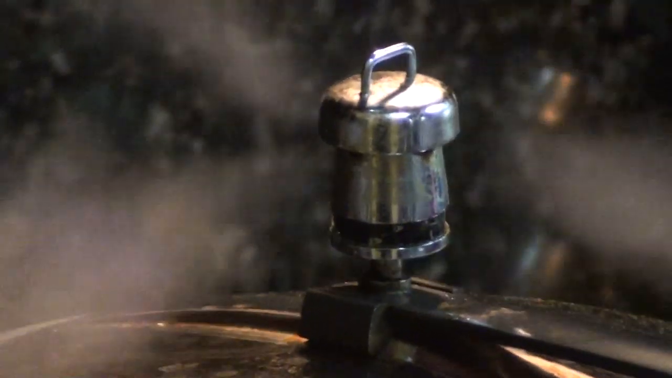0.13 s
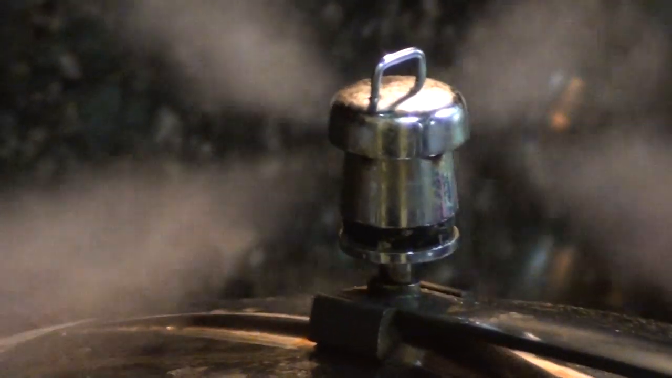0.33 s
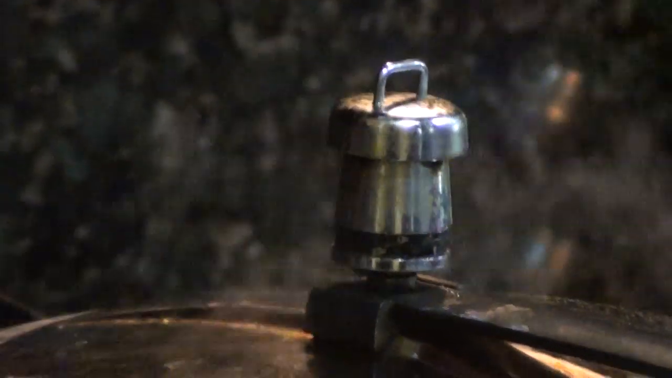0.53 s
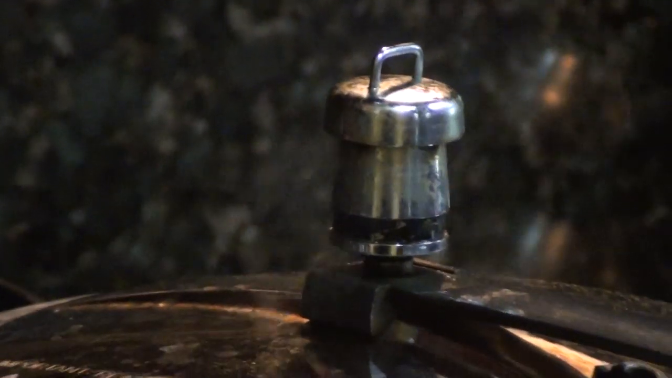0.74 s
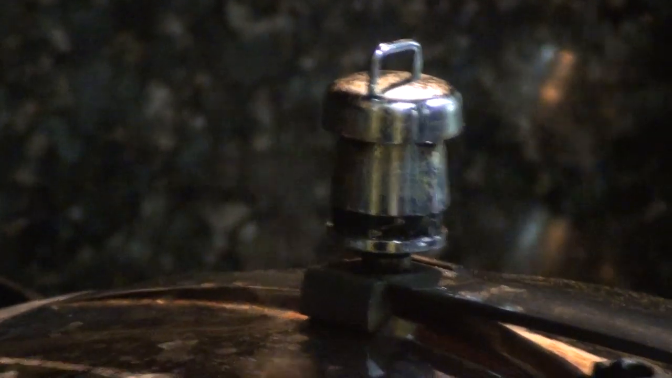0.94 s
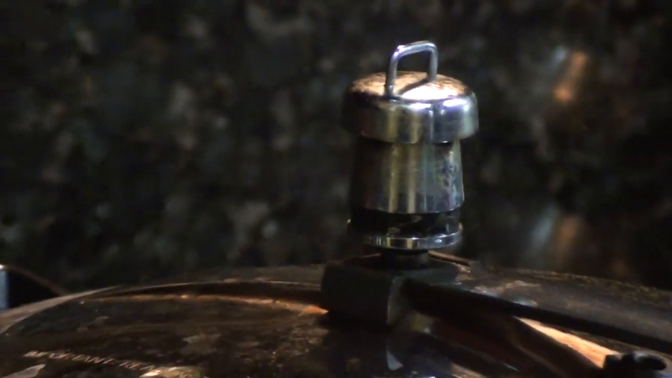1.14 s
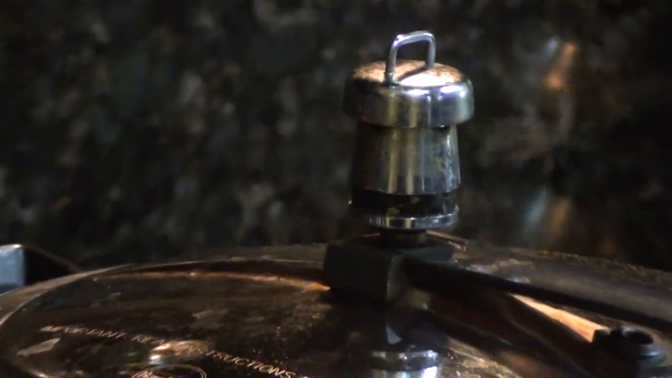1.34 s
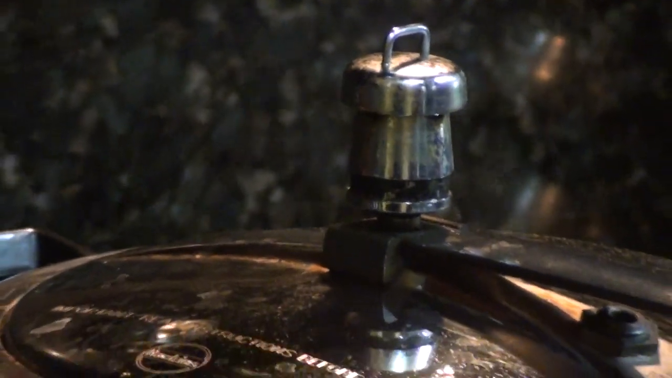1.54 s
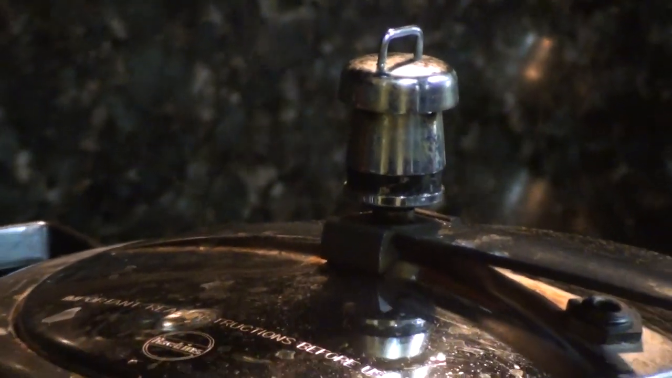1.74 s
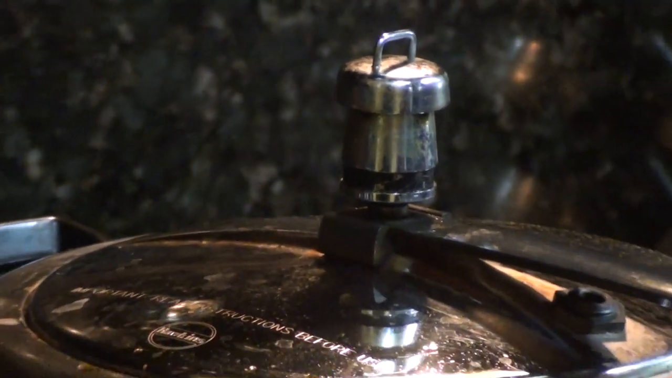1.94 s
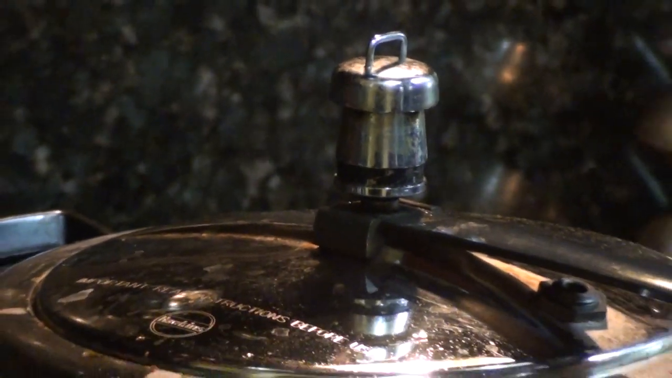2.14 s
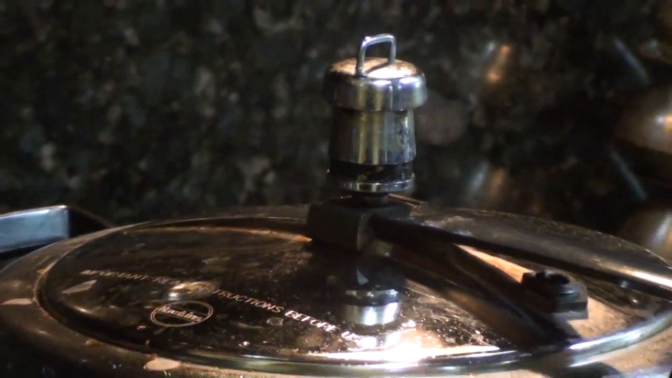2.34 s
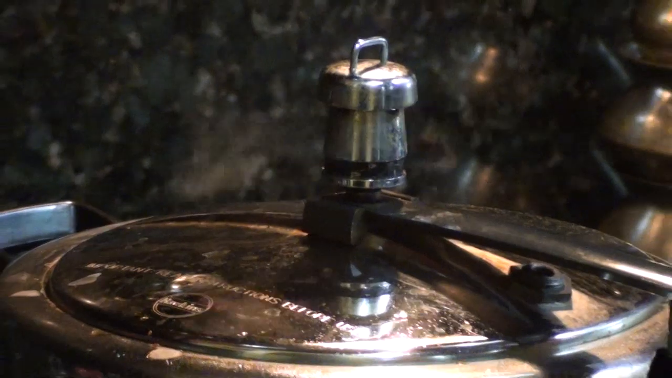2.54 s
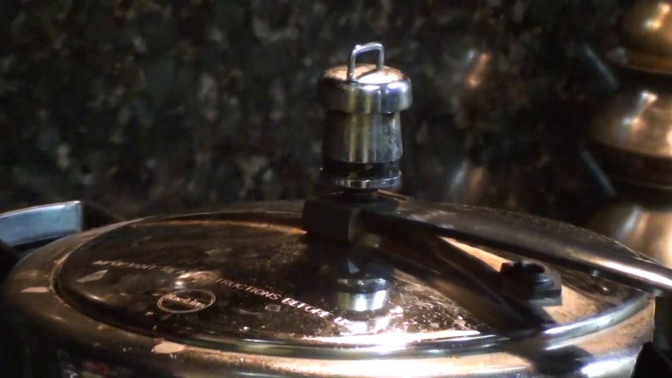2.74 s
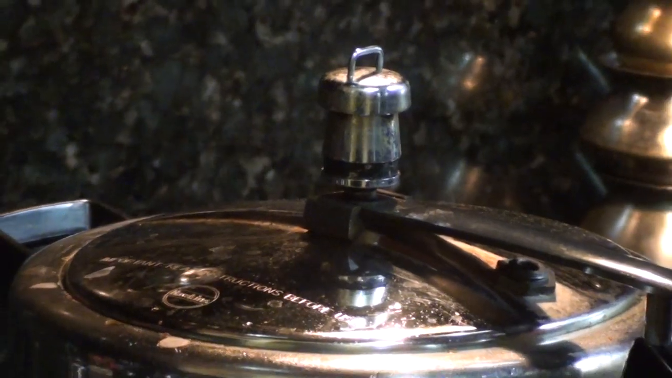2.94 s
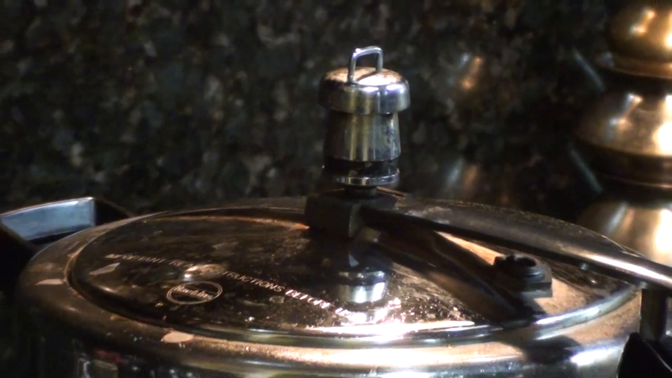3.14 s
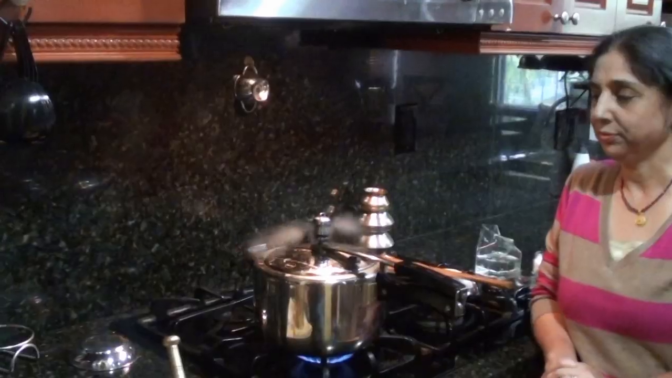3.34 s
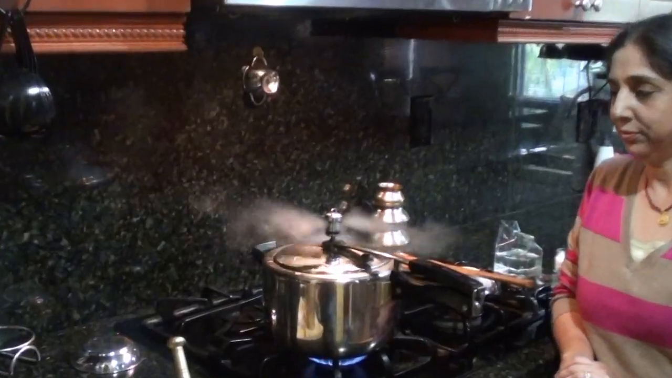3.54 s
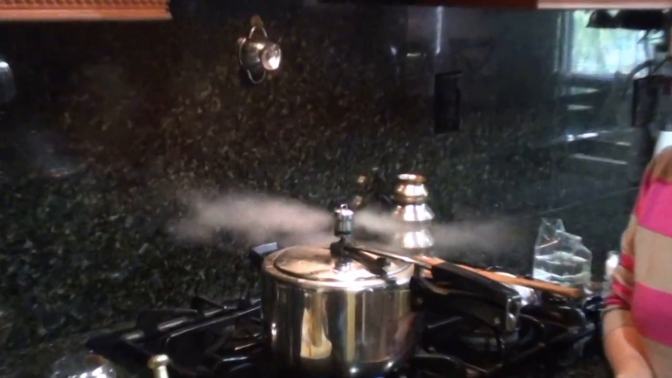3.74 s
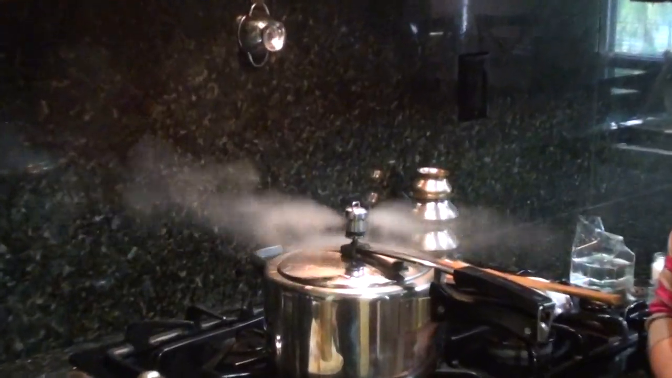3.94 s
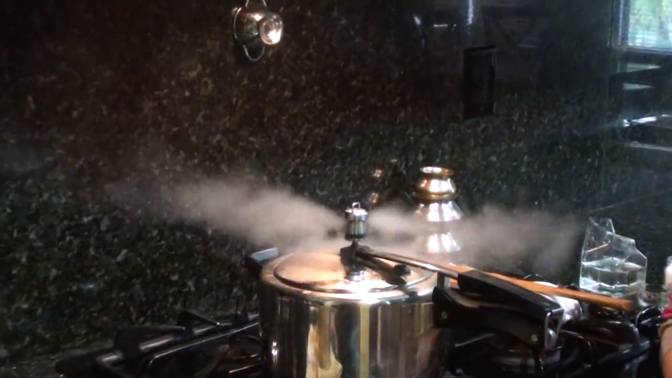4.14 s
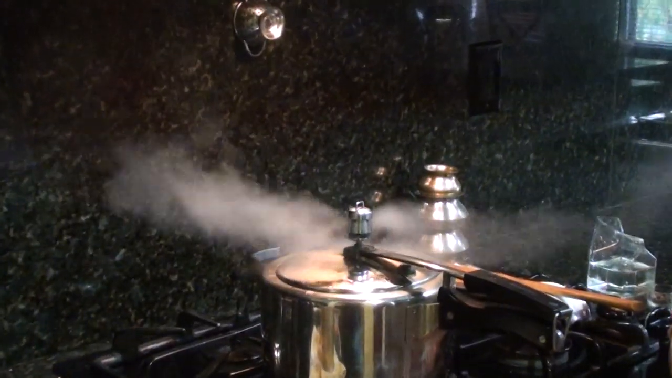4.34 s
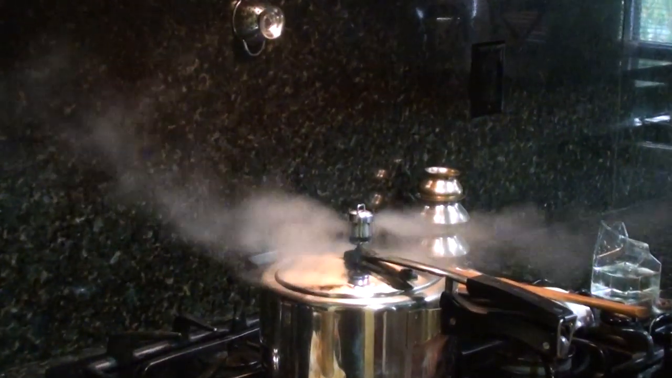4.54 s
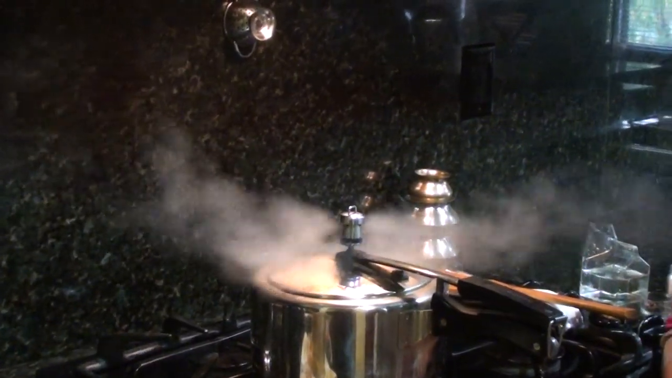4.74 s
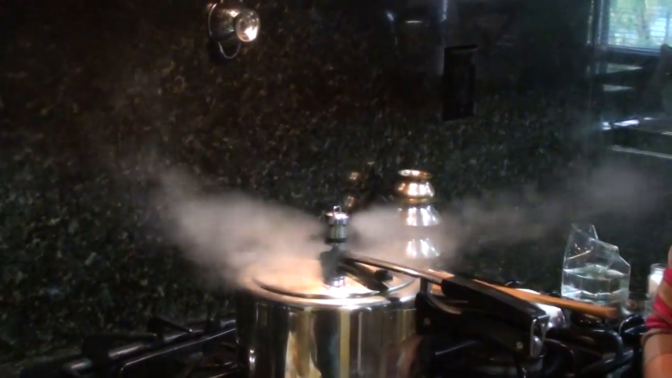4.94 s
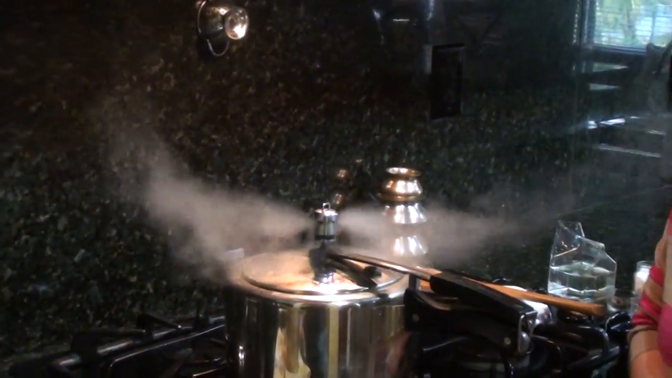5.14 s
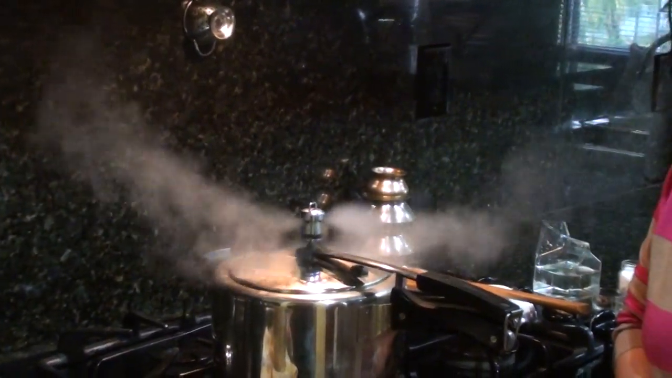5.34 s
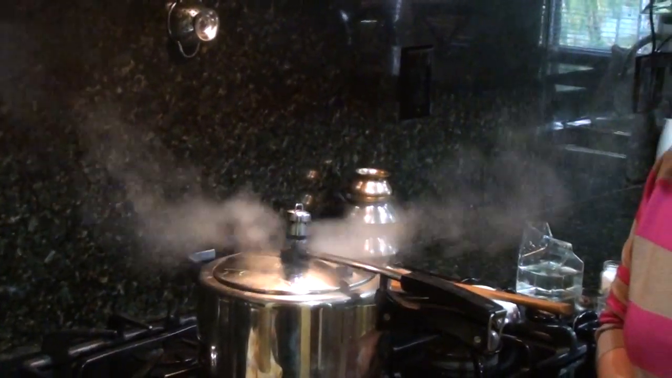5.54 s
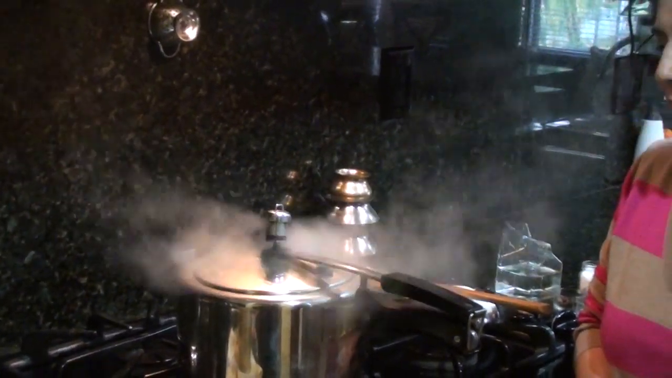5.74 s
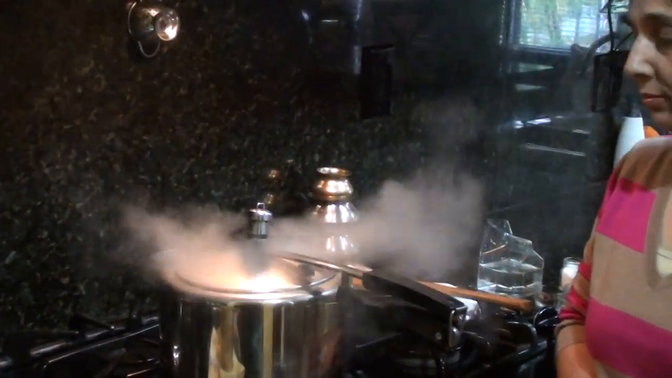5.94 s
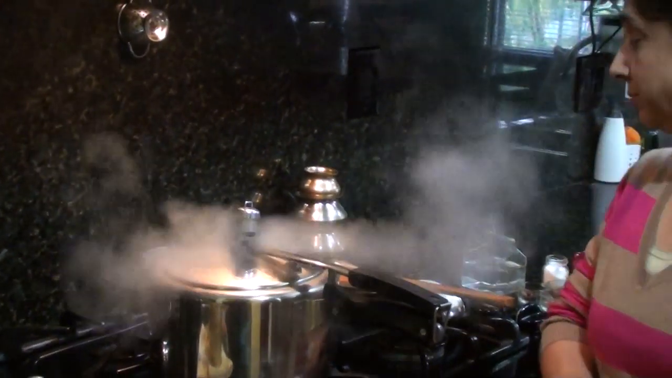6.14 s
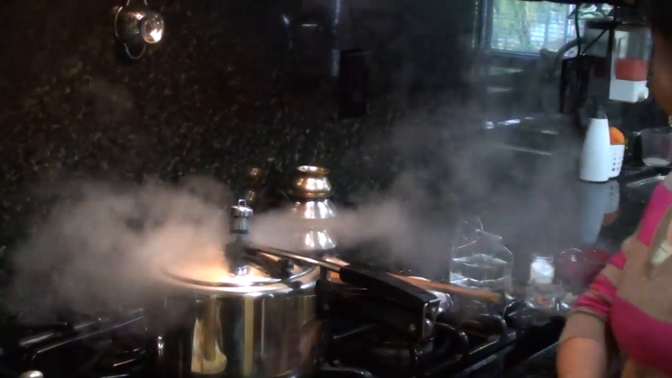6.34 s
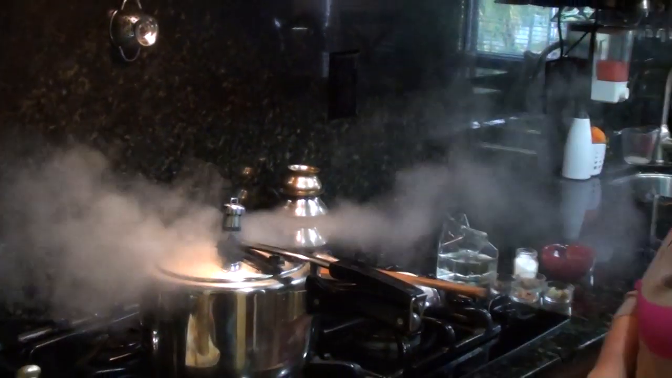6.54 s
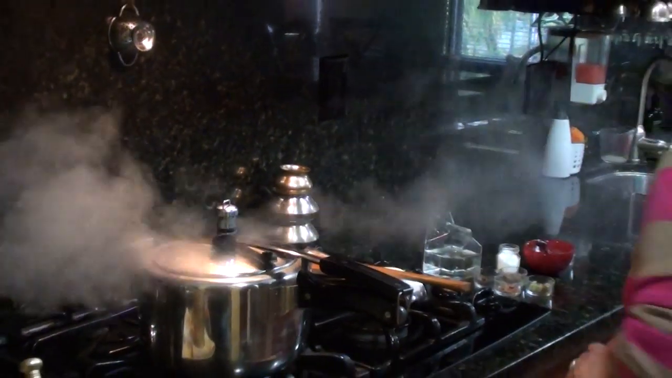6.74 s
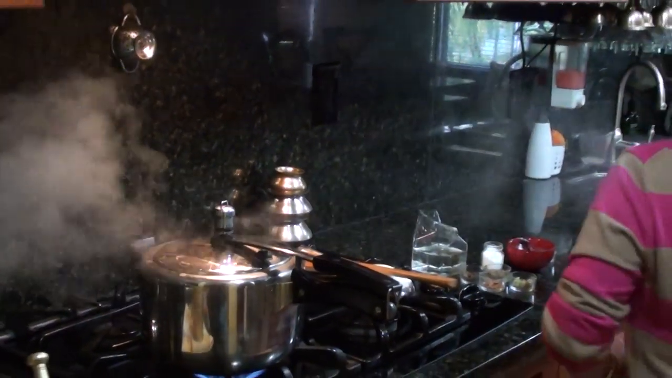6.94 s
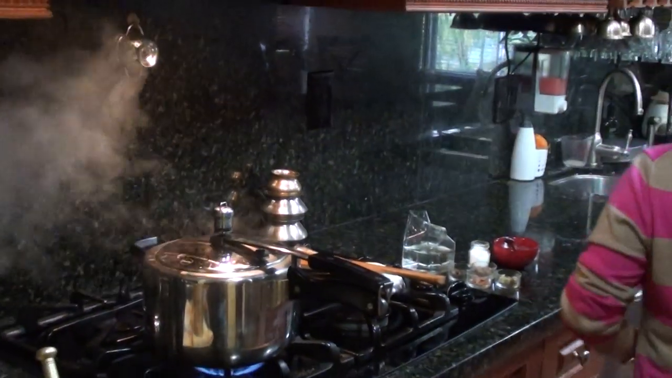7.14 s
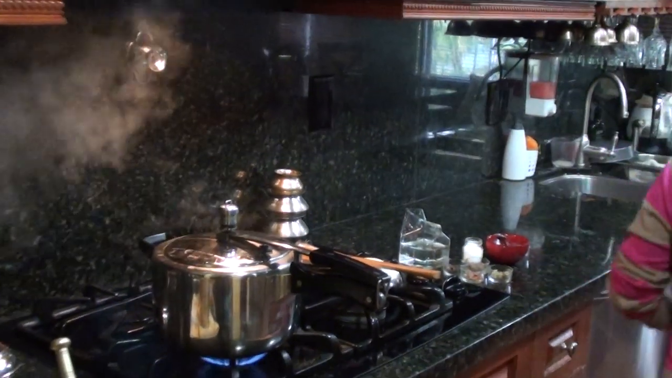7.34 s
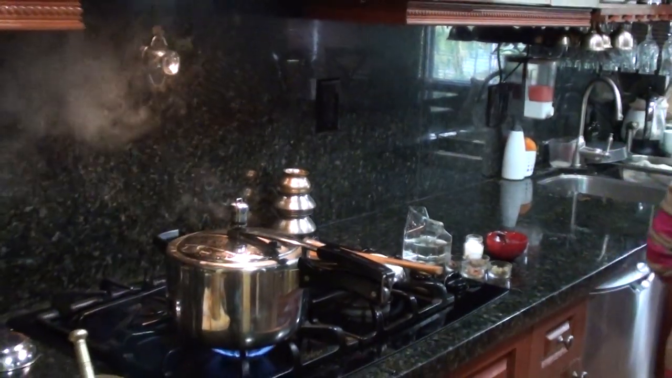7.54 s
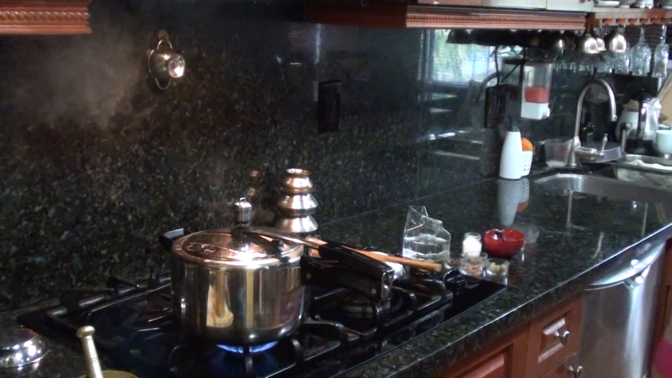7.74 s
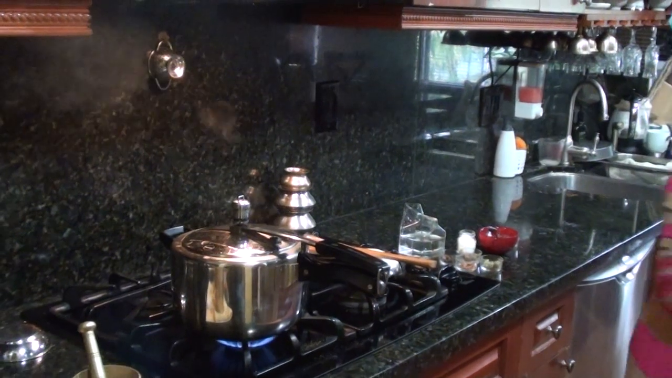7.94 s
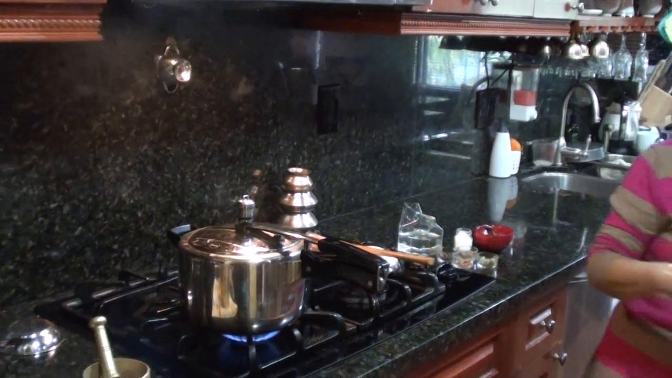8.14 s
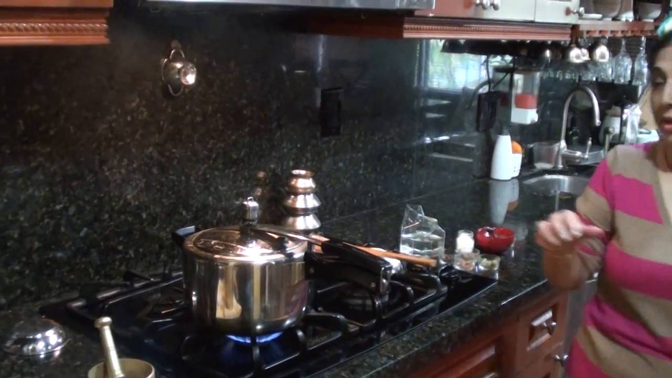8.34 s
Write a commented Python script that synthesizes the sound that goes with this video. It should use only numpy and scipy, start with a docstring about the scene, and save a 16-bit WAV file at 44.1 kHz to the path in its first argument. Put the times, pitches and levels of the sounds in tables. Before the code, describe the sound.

A pressure cooker close by in a small kitchen lets out a loud, bright hiss of steam, cut off almost at once by the hollow clunk of its weighted valve. A thin leak throbs and slowly grows over a murmuring gas flame. A second loud hiss bursts out, holds for over three seconds and ends in a rattling clunk. The faint leak returns, followed by light taps and a brief scrape.

```python
"""Pressure cooker on a gas stove

In a small kitchen, steam lifts a weighted valve twice and escapes as a hissing turbulent jet.
Each time the weight drops shut, its impact rings the pot's modes with a hollow clunk, and a thin
leak throbs while pressure builds. The flame murmurs below; near the end something nearby is
knocked, then pushed along with stick-slip friction."""
import sys
import numpy as np
from scipy import signal
from scipy.fft import rfft, irfft
from scipy.io import wavfile
from scipy.ndimage import uniform_filter1d, map_coordinates

SR = 44100
rng = np.random.default_rng(int(sys.argv[2]) if len(sys.argv) > 2 else 0)


def to_wav(s):
    """Save 16-bit WAV."""
    ch = np.atleast_2d(s).T  # columns
    pcm = np.round(np.clip(ch, -1, 1) * 32767)  # PCM
    wavfile.write(sys.argv[1], SR, pcm.astype(np.int16))


N = 373968
T = np.arange(N) / SR
CLOSING_DB_PER_S = 312  # the sinking weight chokes the flow

# valve open: lift_s, sink_s, level_db, thinning_s
BLOWS = [(0, 0.554, -15.5, 1.2), (3.35, 6.725, -15, 5.5)]
# valve shut, pressure building: start_s, end_s, leak_db, leak_rise_db_per_s,
# throb_crest_s, throb_hz, murmur_db, murmur_rise_db_per_s
BUILD_UPS = [(.6, 3.35, -59, 4, 1.25, 3.87, -66, 3), (6.8, 8.6, -57.5, 4, 7.57, 4.2, -61, 3.2)]


def amp(db):
    """Decibels to amplitude ratio."""
    return 10 ** (np.asarray(db) / 20)


def unit(x):
    """Normalisation to rms 1."""
    return x / np.sqrt(np.mean(x ** 2) + 1e-20)


def read(points, hz):
    """Interpolation along a log-frequency axis."""
    table_hz, value = np.transpose(points)
    return np.interp(np.log(hz + 1), np.log(table_hz + 1), value)


def shaped(x, points):
    """Zero-phase filtering by rows of frequency_hz, gain_db."""
    return irfft(rfft(x) * amp(read(points, np.fft.rfftfreq(N, 1 / SR))), N)


def add(mix, start_s, sound):
    """Superposition of a sound onto the mix."""
    part = mix[round(start_s * SR):][:len(sound)]
    part += sound[:len(part)]


def envelope(start, end, rise_s, fall_db_per_s):
    """Linear attack from start, a hold at 1, exponential decay after end."""
    return np.clip((T - start) / rise_s, 0, 1) * amp(-fall_db_per_s * np.maximum(T - end, 0))


def drift(rate_hz):
    """Random modulation: low-passed noise of rms 1."""
    hz = np.fft.rfftfreq(N, 1 / SR)
    return unit(irfft(rfft(rng.standard_normal(N)) * np.exp(-(hz / rate_hz) ** 2) * (hz > 0), N))


def hiss(colour, resonances):
    """Source and filter: broadband turbulence coloured by resonant peaks and dips."""
    hz = np.fft.rfftfreq(N, 1 / SR)
    peaks_db = sum(db / (1 + (2 * (hz - centre) / width) ** 2) for centre, width, db in resonances)
    return unit(irfft(rfft(rng.standard_normal(N)) * amp(read(colour, hz) + peaks_db), N))


def low_cut(x, hz):
    """Radiation efficiency: small bodies give out little bass."""
    return signal.sosfilt(signal.butter(2, hz, "high", fs=SR, output="sos"), x)


def tail():
    """Diffuse reflections of total energy 1; absorption takes the highest treble first."""
    # reverberation time of the kitchen: frequency_hz, t60_s
    decay_times = [(150, 0.74), (700, 0.35), (2500, 0.46), (7000, 0.39), (15000, 0.12)]
    hz, t, bands = signal.stft(rng.standard_normal(SR // 2), SR, nperseg=256)
    bands = bands * amp(-60 * t / read(decay_times, hz)[:, None]) * (t > .002)
    bands /= np.sqrt(uniform_filter1d((abs(bands) ** 2).sum(1), 3))[:, None]  # equal energy per band
    echoes = signal.istft(bands, SR, nperseg=256)[1]
    return echoes / np.linalg.norm(echoes)


def kitchen(x, wet_db, turning=False):
    """Direct plus reverberant field; a turning field crossfades slowly between two tails."""
    angle = 2 * np.pi * 0.3465 * T + rng.uniform(0, 2 * np.pi)
    shares = [np.cos(angle), np.sin(angle)] if turning else [1]
    wet = sum(share * signal.oaconvolve(x, tail())[:N] for share in shares)
    return (x + amp(wet_db) * wet) / np.hypot(1, amp(wet_db))


def jet(blow, colour, vent):
    """Jet noise under the lifted weight: a puff, a hold that thins if it lasts, a quick choke."""
    # jet spectrum once the pressure gives way: frequency_hz, density_db
    thin_colour = [(180, -48), (300, -36.5), (331, -36), (518, -46.5), (611, -32.5), (771, -27),
                   (1520, -24), (2080, -14), (2540, -16.5), (3000, -13), (3840, -16), (4170, -11),
                   (8510, 2.5), (11700, -4), (15700, -19.5)]
    lift_s, sink_s, level_db, thinning_s = blow
    thin_share = np.interp(np.tanh((T - thinning_s) / .072), [-1, 1], [.074, .92])
    steam = np.sqrt(1 - thin_share) * hiss(colour, vent) + np.sqrt(thin_share) * hiss(thin_colour, vent)
    puff = 1 + 0.89 * np.exp(-np.maximum(T - lift_s, 0) / 0.011)
    flutter_db = .3 * drift(45)
    return steam * envelope(lift_s, sink_s, 1 / SR, CLOSING_DB_PER_S) * puff * amp(level_db + flutter_db)


def lid_echo(x, start_s, delay_ms, slide_ms_per_s, reflection=.19):
    """Comb filtering: a reflection off the lid makes ripples that slide if its path changes."""
    emitted_s = T - (delay_ms + slide_ms_per_s * (T - start_s)) / 1000
    echo = map_coordinates(x, [emitted_s * SR], order=3, mode="wrap")
    return (x + reflection * echo) / np.hypot(1, reflection)


def plumes(count=3):
    """Incoherent sources add in power: each blow is several jets, each with its own room echoes."""
    # jet spectrum of each blow: frequency_hz, density_db
    first_colour = [(150, -48), (450, -42.5), (680, -25), (1100, -28), (1500, -21.5), (1900, -17.5),
                    (2800, -12), (3600, -12.5), (4300, -7.5), (7900, 0.5), (9700, 0), (10800, -6.5),
                    (12100, -5.5), (13000, -11), (15700, -18.5)]
    second_colour = [(180, -50.5), (300, -36), (446, -49), (746, -21), (866, -26.5), (1570, -21.5),
                     (1850, -13), (1980, -16.5), (2950, -12), (3660, -14.5), (4310, -9.5), (7960, 1),
                     (11100, -2.5), (13300, -15), (15700, -16.5)]
    # resonances of vent, weight and lid in each blow: centre_hz, width_hz, boost_db
    first_vent = [(690, 140, 2), (1860, 90, 3), (2750, 120, 3), (3580, 150, -3), (4820, 130, 3),
                  (6450, 130, 3), (7150, 160, 5), (7430, 150, -3), (7950, 110, 2), (8140, 120, -4),
                  (8320, 130, 3), (8720, 130, 3)]
    second_vent = [(740, 180, 1), (1863, 80, 3), (3780, 200, -3), (7270, 130, 1.5), (8020, 120, -2),
                   (8210, 150, 1)]
    # path off the lid to a moving listener, per blow: delay_ms, slide_ms_per_s
    lid_paths = [(2.02, 0), (1.961, -.007)]
    colours, vents = (first_colour, second_colour), (first_vent, second_vent)
    out = np.zeros(N)
    for blow, colour, vent, path in zip(BLOWS, colours, vents, lid_paths):
        steam = sum(kitchen(jet(blow, colour, vent), wet_db=1.5, turning=True) for _ in range(count))
        out += lid_echo(steam, blow[0], *path)
    return out / np.sqrt(count)


def burner():
    """Combustion noise with faint pot resonances; the murmur swells while the valve is shut."""
    # spectrum of flame and simmering pot: frequency_hz, density_db
    colour = [(15, -42), (25, -29), (108, -1.5), (168, -0.5), (569, -6), (636, -7.5), (760, -8),
              (991, -5.5), (1650, -11), (2460, -10.5), (3670, -15.5), (3920, -16), (4190, -11),
              (5000, -13.5), (6500, -30), (11000, -120)]
    rings = [(188, 25, 1.33), (641, 32, 6.8), (1375, 36, 7.4)]  # centre_hz, width_hz, boost_db
    level_db = np.full(N, -65.5)  # with the valve open
    for start, end, *_, murmur_db, rise in BUILD_UPS:
        level_db = np.where((T >= start) & (T < end), murmur_db + rise * (T - start), level_db)
    return hiss(colour, rings) * amp(level_db + 0.2 * drift(6.6))


def clunks(ping_hz=3240, ping_t60=.35):
    """Modal ringing: the weight strikes its seat; neighbouring pot modes start in opposite phase."""
    # the weight lands and rebounds: start_s, level_db, hardness_db_per_octave, ping_db
    landings = [(.577, -22.5, -3, -38), (.606, -29, -3, -58), (6.749, -26.5, 0, -66), (6.754, -29, 0, -70),
                (6.779, -30, -1, -70), (6.793, -30, -1, -70)]
    # modes of the closed pot: pitch_hz, level_db, t60_s
    pot_modes = [(231, -24.5, 0.21), (572, -13, .05), (645, -3.5, 0.093), (708, -1.5, 0.15),
                 (764, -22, 0.076), (883, -12, 0.11), (971, -12, .1), (1205, -7.5, 0.089),
                 (1307, -10, 0.086), (1467, -2.5, 0.051), (1760, -7, 0.037), (2110, -5, 0.05),
                 (2340, -3, 0.047), (2900, -26, .03)]
    out, t = np.zeros(N), T[:SR // 2]
    for start, db, hardness, ping_db in landings:
        for k, (hz, mode_db, t60) in enumerate(pot_modes):
            tilt_db = hardness * np.log2(hz / 700)
            decay = amp(db + mode_db + tilt_db - 60 * t / t60)
            add(out, start, (-1) ** k * decay * np.sin(2 * np.pi * hz * t))
        lid_flex = amp(db + 10 - 60 * t / 0.0088) * np.cos(2 * np.pi * 780 * t)
        weight_ping = amp(ping_db - 60 * t / ping_t60) * np.sin(2 * np.pi * ping_hz * t)
        add(out, start, lid_flex + weight_ping)
    return low_cut(out, hz=90)


def leak(throb_depth_db=2, throb_fade_s=3.4, waver_hz=10, swell_db_per_s=1.5):
    """Flow through a narrow gap: a throbbing hiss that grows with pressure, and wavering whistles."""
    # spectrum of the seeping steam: frequency_hz, density_db
    colour = [(1180, -25), (2000, -14.5), (2480, -12), (3300, -13), (3800, -14), (4090, -15), (7100, -1),
              (8380, -4), (9790, -5.5), (14300, -18.5)]
    # resonances of the gap: centre_hz, width_hz, boost_db
    seat = [(2520, 30, 6), (5880, 130, 4), (6150, 68, 2), (6870, 90, -2), (7360, 60, -2), (7600, 71, 3.5),
            (8850, 100, -5), (9900, 270, -4.5)]
    # faint tones of the gap: start_s, end_s, pitch_hz, level_db
    whistles = [(1.15, 2.73, 3838, -69.5), (1.4, 2.74, 3898, -75), (7.64, 7.99, 3898, -71),
                (7.68, 7.99, 3957, -73)]
    flow = amp(-46) * envelope(6.948, 6.973, .025, 60 / .35)  # a last spit as the weight settles
    for start, end, db, rise, crest_s, throb_hz, _, _ in BUILD_UPS:
        age = np.maximum(T - start, 0)
        depth_db = throb_depth_db * np.exp(-age / throb_fade_s)  # shrinks as the pressure steadies
        throb_db = depth_db * np.cos(2 * np.pi * throb_hz * (T - crest_s))
        gate = envelope(start, end, .05, CLOSING_DB_PER_S)
        flow = np.hypot(flow, amp(db + rise * age + throb_db) * gate)
    seep = hiss(colour, seat) * flow * amp(0.54 * drift(60))
    for start, end, hz, db in whistles:
        pitch_hz = hz + waver_hz * drift(96)
        gate = envelope(start, end, rise_s=.09, fall_db_per_s=170)
        gain = amp(db + swell_db_per_s * (T - start)) * gate
        seep += np.sqrt(2) * gain * np.sin(2 * np.pi * np.cumsum(pitch_hz) / SR)
    return seep


def low_thump(level_db=-34, width_s=.00074):
    """A critically damped transient: a brief low thump at the abrupt start of the second hiss."""
    age = np.maximum(T - BLOWS[1][0], 0) / width_s
    return amp(level_db) * (age > 0) * (1 - age) * np.exp(-age)


def ticks_and_bumps(rise_s=.0015):
    """Heavily damped transients: each is a fast-decaying band of noise."""
    # a spit of hiss, then light taps: start_s, level_db, centre_hz, width_octaves, t60_s
    bursts = [(6.965, -53, 3800, .85, .14), (7.185, -58, 1300, .7, .14), (7.35, -53, 150, .7, .12),
              (7.376, -46, 4400, .85, .06), (7.39, -46, 4400, .85, .04), (7.65, -57, 1900, .4, .1),
              (8.193, -51, 700, 1.8, .14), (8.226, -41.5, 2700, 1, .035), (8.284, -41, 500, .5, .03)]
    out, t = np.zeros(N), T[:SR // 4]
    hz = np.fft.rfftfreq(len(t), 1 / SR) + 1
    attack = 1 - np.exp(-t / rise_s)
    for start, db, centre_hz, octaves, t60 in bursts:
        band = np.exp(-(np.log2(hz / centre_hz) / octaves) ** 2)
        noise = unit(irfft(rfft(rng.standard_normal(len(t))) * band, len(t)))
        add(out, start, attack * amp(db - 60 * t / t60) * noise)
    return out


def push(slips_per_s=1500):
    """Stick-slip friction: tiny uneven slips excite the modes of a hollow body."""
    # modes of the pushed body: pitch_hz, width_hz, level_db
    modes = [(415, 34, 1), (680, 130, -10), (1450, 90, -11), (1630, 80, -8), (1930, 60, -3),
             (2900, 900, -22)]
    # short shoves: start_s, end_s, level_db
    shoves = [(8.27, 8.383, -48.5), (8.41, 8.48, -57)]
    t = T[:SR // 10]
    slips = rng.choice([-1, 1], N) * (rng.random(N) < slips_per_s / SR)
    body = sum(amp(db) * width * np.exp(-np.pi * width * t) * np.cos(2 * np.pi * hz * t)
               for hz, width, db in modes)
    force = sum(amp(db) * envelope(start, end, rise_s=.016, fall_db_per_s=700)
                for start, end, db in shoves)
    return low_cut(unit(signal.oaconvolve(slips, body)[:N]) * force, hz=220)


def scene():
    """Mid-side stereo: sources sit in the middle; the room spreads them, the murmur most."""
    # spread of the room's echoes and of the diffuse murmur: frequency_hz, side_gain_db
    echo_width = [(60, -12), (200, -22), (400, -24), (700, -19), (1800, -22.5), (3700, -12.5),
                  (4400, -18.5), (5200, -15.5), (6400, -11.5), (8200, -17), (11000, -23.5), (13000, -25),
                  (15500, -31)]
    murmur_width = [(60, -15), (120, -19), (220, -16), (400, -7.5), (1200, -6), (2400, -7.5), (4000, -14)]
    near = plumes() + low_thump() + kitchen(clunks(), wet_db=-1) + kitchen(leak(), wet_db=-5.5)
    near += kitchen(ticks_and_bumps() + push(), wet_db=-9)
    mid = near + burner()
    side = shaped(signal.oaconvolve(near, tail())[:N], echo_width) + shaped(burner(), murmur_width)
    return np.array([mid + side, mid - side])


def record(dry):
    """Band limiting by a steep low-pass filter."""
    edge_hz = 15780
    low_pass = signal.firwin(511, edge_hz, window=("kaiser", 9), fs=SR)
    return signal.oaconvolve(dry, low_pass[None], "same")


dry = scene()
out = record(dry)
to_wav(out)
```